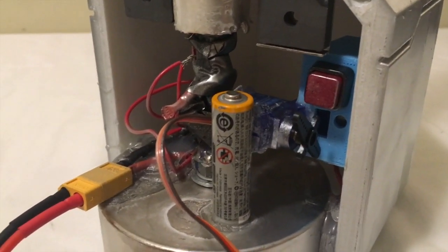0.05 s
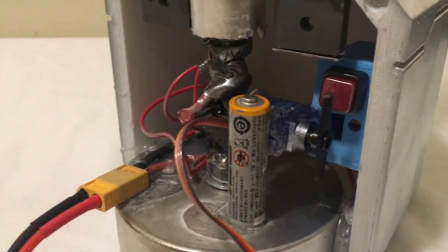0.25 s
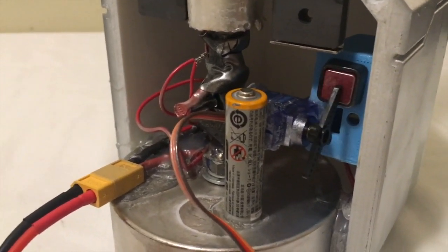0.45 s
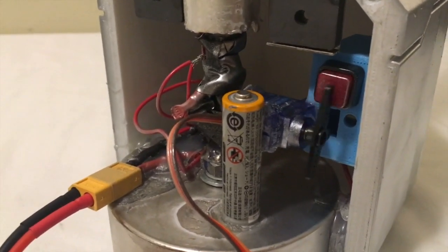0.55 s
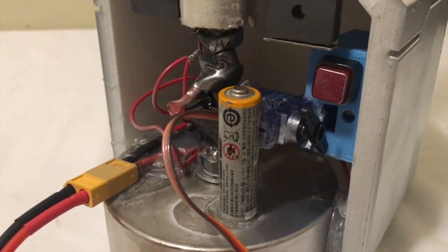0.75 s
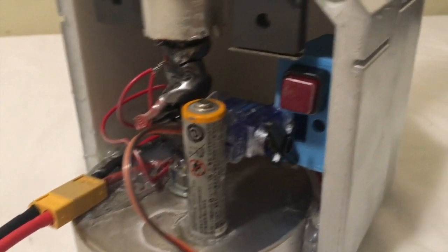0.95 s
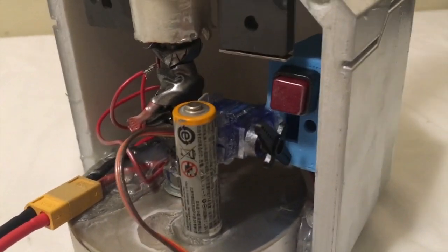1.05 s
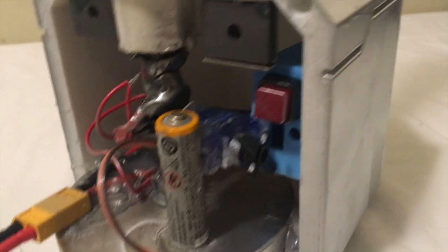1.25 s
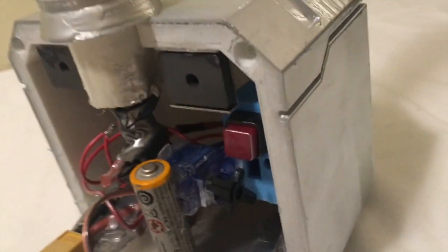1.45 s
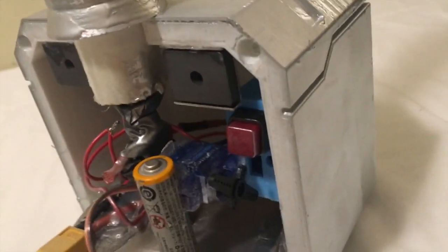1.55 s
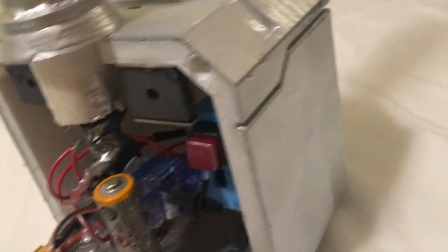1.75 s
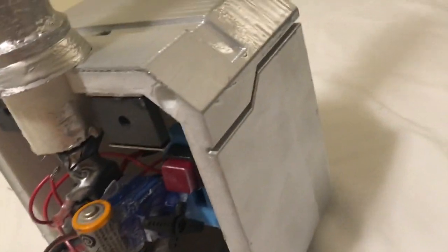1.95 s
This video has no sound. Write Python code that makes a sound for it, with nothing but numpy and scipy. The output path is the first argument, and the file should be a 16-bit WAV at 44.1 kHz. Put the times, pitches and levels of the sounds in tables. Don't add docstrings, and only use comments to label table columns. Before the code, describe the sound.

Close up in a quiet room, a tiny geared motor buzzes, clicks a switch loudly, pauses, buzzes back with a second bright click and winds down; later dull handling thuds, small creaks and rustling on the phone.

```python
import sys
import numpy as np
from scipy import signal
from scipy.fft import rfft, irfft
from scipy.io import wavfile
from scipy.ndimage import uniform_filter1d

SR = 44100
rng = np.random.default_rng(int(sys.argv[2]) if len(sys.argv) > 2 else 0)


def materialize(psi):
    bounded = np.clip(np.atleast_2d(psi).T, -1, 1)
    quanta = np.round(bounded * 32767).astype(np.int16)
    wavfile.write(sys.argv[1], SR, quanta)


def to_linear_factor(level_db):
    exponent = np.asarray(level_db, float) / 20
    return 10 ** exponent


N = 88200
t = np.arange(N) / SR

# frequency in Hz, level in dB.
AIR = [(18, -35.5), (30, -3.5), (81, 0), (109, -17.5), (227, -11), (649, -27.5), (801, -29), (4300, -44),
       (16000, -57)]
AIR_DB = -58
# frequency in Hz, rms level in dB.
HUM = [(59.3, -51), (119, -73), (239, -66)]

# start in seconds, peak in dB, pitch in Hz, length in cycles.
THUDS = [(1.031, -42.5, 90, 2), (1.124, -37.5, 140, 10), (1.192, -44, 200, 1.2), (1.317, -42, 286, 9.4),
         (1.37, -45, 140, 6.6), (1.631, -25, 135, 2.13), (1.702, -31.5, 234, 4.9), (1.743, -42.5, 107, 3.2),
         (1.921, -38.5, 170, 3.9), (1.938, -41, 139, 3.2), (1.954, -39.5, 204, 2.5), (1.968, -37, 150, 2),
         (1.979, -39.5, 104, 3), (0.186, -47.5, 348, 5), (.15, -56.5, 150, 6), (1.325, -50, 410, 9),
         (1.652, -40, 115, 2), (.535, -50, 130, 4)]
# time in seconds, level in dB.
RUMBLE = [(.95, -68), (1.05, -55.5), (1.45, -53.5), (1.58, -74), (1.695, -54), (1.72, -41.5), (1.85, -67),
          (1.94, -45), (2, -56)]
# time in seconds, level in dB.
RUSTLE = [(1.6, -78), (1.63, -73.5), (1.7, -79), (1.705, -58), (1.79, -55), (1.884, -59.5), (1.92, -58),
          (1.97, -54), (2.0, -50)]
# frequency in Hz, level in dB.
CLOTH = [(240, -39), (400, 0.5), (1130, -15.5), (1990, -4.5), (2800, -13), (4380, -10), (4880, -14),
         (16000, -28)]
# start in seconds, level in dB, decay in seconds.
CREAKS = [(1.7203, -45, 0.0017), (1.7045, -58, 0.0029), (1.8919, -46, 0.0023), (1.8947, -42, 0.0036),
          (1.903, -48, 0.0049), (1.917, -55, 0.0018), (1.97, -57, .003), (1.63, -72.5, 0.0023),
          (1.638, -68, 0.0031)]
# frequency in Hz, level in dB.
CREAK_COLOUR = [(1000, -24.5), (2800, 3.5), (4500, 5.5), (9000, -9.5), (12000, -17), (16000, -22)]
# time in seconds, level in dB.
SLIDE = [(1.3, -77), (1.37, -69), (1.5, -76.5), (1.69, -84), (1.71, -65), (1.76, -79), (1.89, -69),
         (1.92, -57), (1.955, -53), (2, -67.5)]

# start in seconds, peak in dB, box share in dB, brightness in dB.
SNAPS = [
    (.3738, -8, -25.5, 0.5),
    (.3754, -13, -20.5, -1.5),
    (.3768, -13, -19.5, -0.5),
    (.3790, -20.5, -32.5, -0.5),
    (.5740, -12.5, -26, 7),
    (.5757, -11, -24, -0.4),
    (.5770, -11, -18, 6.5),
    (.5885, -24.5, -14, -4),
]
# start in seconds, peak in dB, box share in dB, brightness in dB.
TICKS = [
    (.1803, -32, -23.5, 3),
    (.1835, -41, -29, -3),
    (.186, -35.5, -29.5, -9),
    (.189, -36.5, -25.5, -8),
    (.5297, -26, -23, 7),
    (.5325, -37.5, -12.5, 0),
    (.5625, -31.5, 1.5, -1.5),
    (.025, -53.5, -10, -11),
]
# frequency in Hz, level in dB, T60 in seconds.
SWITCH = [(1720, -11.5, 0.014), (2440, -4.5, 0.014), (2490, -3.5, 0.018), (2870, -1, 0.0059),
          (3410, 3, .009), (4510, -1, .012), (5176, -8.5, 0.0033), (6300, -12.5, 0.0087),
          (8870, -3.5, 0.0057), (10200, -16, .01), (11400, -13, 0.014)]
# frequency in Hz, level in dB, T60 in seconds.
BOX = [(580.6, 9.5, .028), (330, -5.5, 0.06), (645, -1, .025), (1000, 5, 0.0088), (1310, -5.5, 0.01447)]
# start in seconds, frequency in Hz, peak in dB, T60 in seconds.
PINGS = [
    (.3756, 2372, -12.5, 0.025),
    (.3752, 4620, -13, .014),
    (.5755, 4300, -11, 0.01197),
    (.5885, 2330, -25, .04),
    (.344, 590, -36, .08),
    (.577, 582, -24, .04),
    (.590, 600, -30, .06),
    (.382, 325, -44, .15),
    (.595, 335, -44, .15),
]

# start and length in seconds, from and to in Hz, level in dB, half line in dB.
SQUEAKS = [
    (.343, .031, 8400, 4300, -28, -1),
    (.554, .011, 3200, 6500, -28, -20),
]
# start and end in seconds, level in dB, box level in dB.
SCRAPES = [
    (.343, .374, -30, -12),
    (.551, .574, -33, -20),
]

# power on, power off, spin-up and run-down in seconds, top shaft speed in Hz.
SWINGS = [
    (.200, .366, .023, .012, 460),
    (.547, .680, .010, .056, 458),
]
SWING_DB = [-31.5, -34.5]
SLACK_S = (.0045, .002)
LOADED_S = (.348, .9)
# multiple of shaft speed, level swinging out in dB, level swinging back in dB.
ORDERS = [(1, -18, -40), (2, -22.5, -21), (3, -16, -30), (4, -28, -30), (5, -10, -11), (6, -24.5, -13.5),
          (7, -21.5, -20), (8, -19.5, -15.5), (9, -10, -8), (18, -24.5, -21)]
# frequency in Hz, level in dB.
GEAR = [(300, -52), (600, -21), (1400, -8.5), (2300, -7), (4000, 3), (7500, -6.5), (13300, -4.5),
        (16000, -11.5)]
# frequency in Hz, width in Hz, boost in dB.
CASE = [(1700, 250, 5.5), (2400, 300, 10.5), (3760, 300, 3), (4500, 400, 0.5), (6100, 700, 7),
        (8300, 370, 4.5), (9700, 300, 8), (13400, 900, 5)]


def unit(x):
    return x / np.sqrt(np.mean(x ** 2))


def colour(x, points, peaks=()):
    f = np.fft.rfftfreq(len(x), 1 / SR) + 1
    p = np.array(points)
    db = np.interp(np.log(f), np.log(p[:, 0]), p[:, 1])
    for hz, width, boost in peaks:
        db = db + boost / (1 + (2 * (f - hz) / width) ** 2)
    return irfft(rfft(x) * to_linear_factor(db), len(x))


def band(hz, width_hz):
    return unit(signal.lfilter(*signal.iirpeak(hz, hz / width_hz, SR), rng.standard_normal(N)))


def walk(rate):
    k = int(SR / rate)
    steps = np.repeat(rng.standard_normal(N // k + 1), k)
    smooth = uniform_filter1d(uniform_filter1d(steps, k), k)
    return unit(smooth[:N])


def curve(rows):
    return to_linear_factor(np.interp(t, *np.array(rows).T, left=-120))


def ring(modes, u, tilt_db=0.):
    y = np.zeros(len(u))
    for hz, db, t60 in modes:
        strength, phase = rng.random(2)
        level = to_linear_factor(db + 5 * (strength - .5) + tilt_db * np.log2(hz / 3500))
        y += level * np.sin(2 * np.pi * (hz * u + phase)) * 1000. ** (-u / t60)
    return y / np.abs(y).max()


def add(out, s, x):
    i = int(s * SR)
    out[i:i + len(x)] += x[:N - i]


def filtered(x, order, hz, kind="low"):
    return signal.sosfilt(signal.butter(order, hz, kind, fs=SR, output="sos"), x)


def room():
    noise = colour(rng.standard_normal(N), AIR)
    air = unit(filtered(noise, 4, 90, "high")) * to_linear_factor(AIR_DB + 0.96 * walk(2.8))
    hum = sum(np.sqrt(2) * to_linear_factor(db + 1.5 * walk(7.1)) * np.sin(2 * np.pi * hz * t) for hz, db in HUM)
    whine = to_linear_factor(-75) * band(4260, 260)
    hiss = to_linear_factor(-85.5) * band(15000, 2500)
    return air + hum + whine + hiss


def hand():
    out, u = np.zeros(N), t[:6000]
    for s, db, hz, cycles in THUDS:
        v = u * hz / cycles * 3.65
        swell = v * np.exp(1 - v)
        add(out, s, to_linear_factor(db) * swell * np.sin(2 * np.pi * hz * u * (1 - 0.37 * u)))
    rumble_colour = [(50, -25), (110, 0), (200, -3), (363, -9), (520, -26), (1500, -38), (4000, -70)]
    rumble = unit(colour(rng.standard_normal(N), rumble_colour)) * to_linear_factor(1 + 3.3 * walk(30)) * curve(RUMBLE)
    fibres = rng.standard_normal(N) * to_linear_factor(1.28 * walk(300))
    cloth = unit(colour(fibres, CLOTH)) * to_linear_factor(-2.5 + .8 * walk(66)) * curve(RUSTLE)
    for s, db, decay_s in CREAKS:
        creak = unit(colour(rng.standard_normal(len(u)), CREAK_COLOUR))
        add(out, s, to_linear_factor(db) * creak * np.exp(-u / decay_s))
    slide = band(1052, 640) * to_linear_factor(2.95 * walk(250)) * curve(SLIDE)
    return out + rumble + cloth + slide


def blows():
    cracks, rings, u = np.zeros(N), np.zeros(N), t[:4000]
    for rows, ring_db in ((SNAPS, -3), (TICKS, -15)):
        for s, db, box_db, bright_db in rows:
            crack_colour = [(300, -29.5), (900, -11.5), (2500, -3),
                            (6000, -7.5 + bright_db), (16000, -8.5 + bright_db)]
            crack = colour(rng.standard_normal(len(u)), crack_colour)
            body = np.exp(-u / 0.0023) * to_linear_factor(-3)
            spike = np.exp(-u / .00015) * to_linear_factor(4.5)
            add(cracks, s, to_linear_factor(db) * filtered(crack * (body + spike), 2, 900, "high"))
            switch = to_linear_factor(ring_db) * ring(SWITCH, u, bright_db)
            box = to_linear_factor(box_db) * ring(BOX, u) * np.clip(u / 0.0013, 0, 1)
            add(rings, s, to_linear_factor(db) * (switch + box))
    for s, hz, db, t60 in PINGS:
        ping = np.sin(2 * np.pi * hz * u) * 1000. ** (-u / t60)
        add(rings, s, to_linear_factor(db) * ping * np.clip(u / 0.0014, 0, 1))
    return cracks, rings


def gate(start, end):
    return np.clip((t - start) / .003, 0, 1) * np.clip((end - t) / 0.00067 + 1, 0, 1)


def squeaks():
    out = np.zeros(N)
    grit = unit(colour(rng.standard_normal(N), GEAR, CASE))
    box = band(580, 70)
    for start, end, db, box_db in SCRAPES:
        box_gain = to_linear_factor(box_db - 300 * np.clip(t - start, 0, 1))
        out += to_linear_factor(db) * gate(start, end) * (grit + box_gain * box)
    for s, dur, from_hz, to_hz, db, half_db in SQUEAKS:
        u = np.clip((t - s) / dur, 0, 1)
        pitch = (from_hz + (to_hz - from_hz) * u ** .85) * (1 + 0.02 * walk(1200))
        phase = 2 * np.pi * np.cumsum(pitch) / SR
        lines = [(1, 0), (.5, half_db - 60 * np.clip(u - .35, 0, 1)), (1.5, -10 - 12 * u)]
        tone = sum(to_linear_factor(d + 3.5 * walk(900)) * np.sin(m * phase) for m, d in lines)
        swell = to_linear_factor(4 * (np.sin(np.pi * u) - .6))
        throb = 1 + .6 * u * np.cos(2 * np.pi * 440 * t)
        out += to_linear_factor(db) * swell * throb * gate(s, s + dur) * tone
    return out


def servo():
    out = np.zeros(N)
    for k, (on, off, up, down, hz) in enumerate(SWINGS):
        rise = 1 - np.exp(-np.clip(t - on, 0, None) / up)
        fall = np.clip(1 - (t - off) / down, 0, 1)
        speed = rise * fall ** 1.5
        mesh = 1 - np.exp(-np.clip(t - on - SLACK_S[k], 0, None) / up)
        free = np.clip((LOADED_S[k] - t) / 0.013, 0, 1)
        turn = 2 * np.pi * np.cumsum(hz * speed * (1 + .003 * walk(150))) / SR
        whine = np.zeros(N)
        for order in ORDERS:
            flicker = to_linear_factor(order[1 + k] + 2.2 * walk(55))
            onset = speed ** (1 + .33 * order[0] ** 2)
            whine += flicker * np.sin(round(order[0]) * turn + 7 * rng.random()) * onset
        teeth = rng.standard_normal(N) * (1 + .3 * np.cos(turn))
        teeth = teeth * to_linear_factor(1.5 * walk(900) + 0.35 * walk(40))
        gear = to_linear_factor(-2) * unit(colour(teeth, GEAR, CASE)) * mesh ** .45 * fall
        brake = to_linear_factor(-13 + 3.4 * walk(200)) * 7 * fall ** 2 * (1 - fall) * np.sin(3 * turn)
        out += to_linear_factor(SWING_DB[k]) * (np.sqrt(2) * whine * free + gear + brake)
    return out


def scene():
    cracks, rings = blows()
    near, u = servo() + squeaks() + cracks, t[:30000]
    n = rng.standard_normal(len(u))
    low = filtered(n, 2, 5000) * 1000. ** (-u / .42)
    treble = np.diff(n, prepend=0) / 2 * 1000. ** (-u / .17)
    tail = (low + treble) * np.clip(u / .006, 0, 1)
    early = rng.standard_normal(len(u)) * 1000. ** (-u / .12) * np.clip(u / 0.0015, 0, 1)
    reverb = (to_linear_factor(-15) * unit(tail) + to_linear_factor(-10.5) * unit(early)) / np.sqrt(len(u))
    echo = signal.fftconvolve(near + to_linear_factor(-11) * rings, reverb)[:N]
    return (near + rings + echo + hand() + room())[None]


def band_limit(x):
    return signal.sosfilt(signal.butter(12, 16810, fs=SR, output="sos"), x)


def record(dry):
    mix = signal.sosfilt(signal.ellip(8, .2, 60, 15800, fs=SR, output="sos"), dry)
    return band_limit(mix)


dry = scene()
out = record(dry)
materialize(out)
```